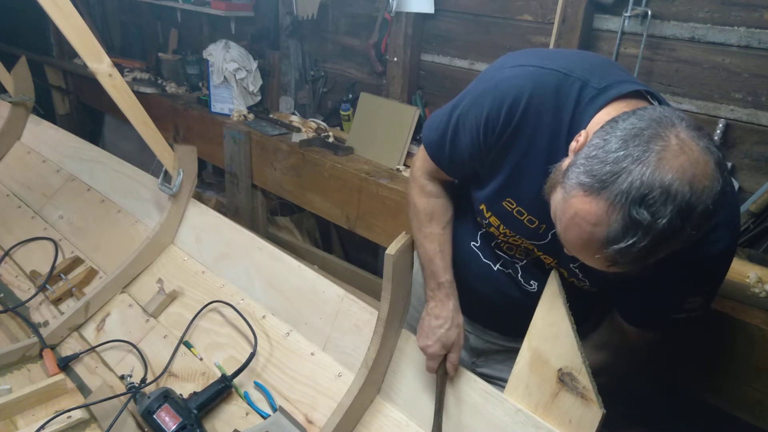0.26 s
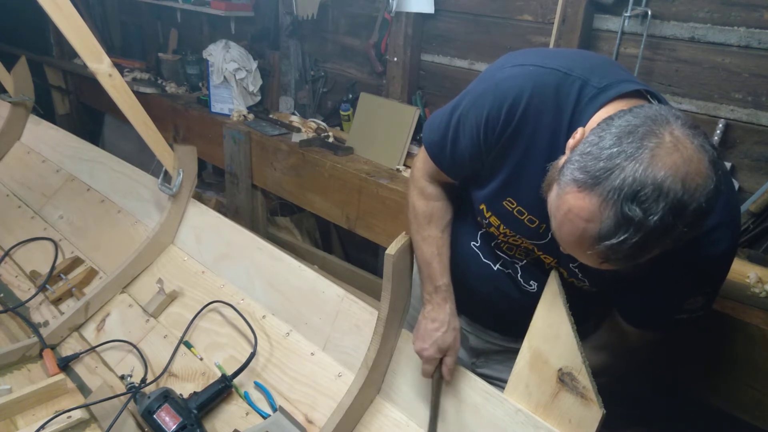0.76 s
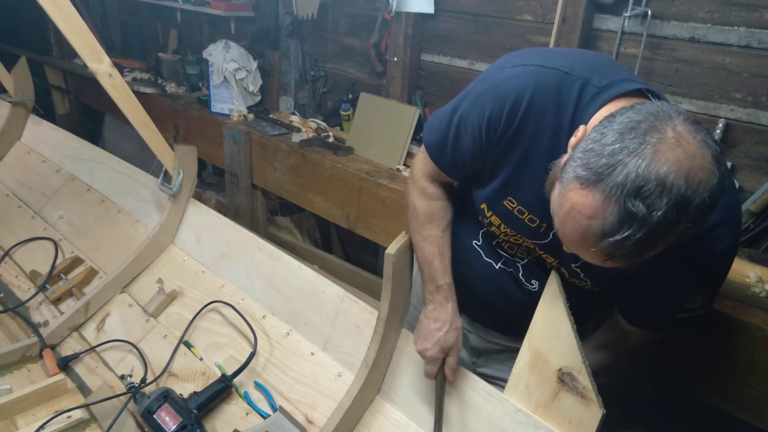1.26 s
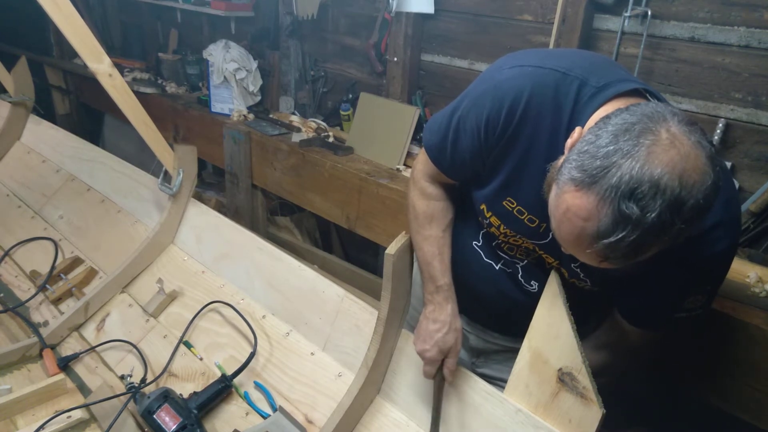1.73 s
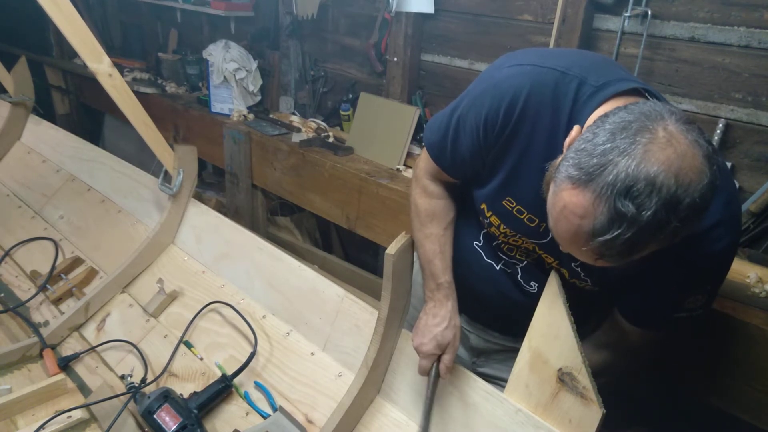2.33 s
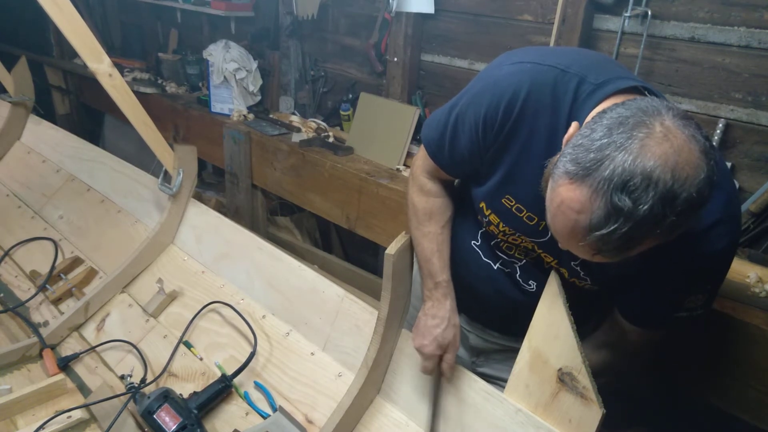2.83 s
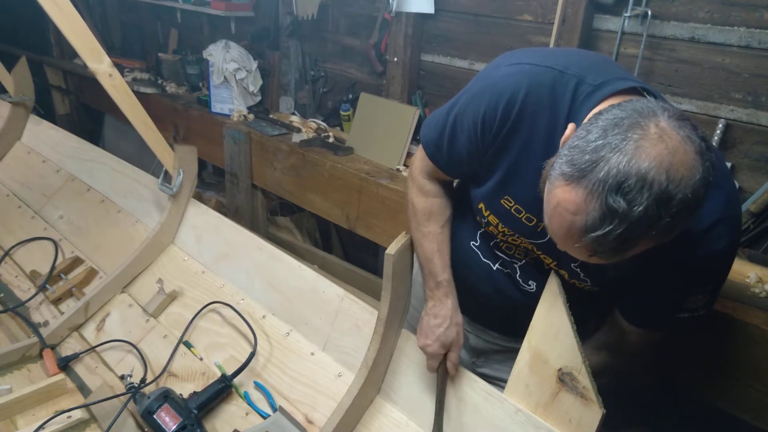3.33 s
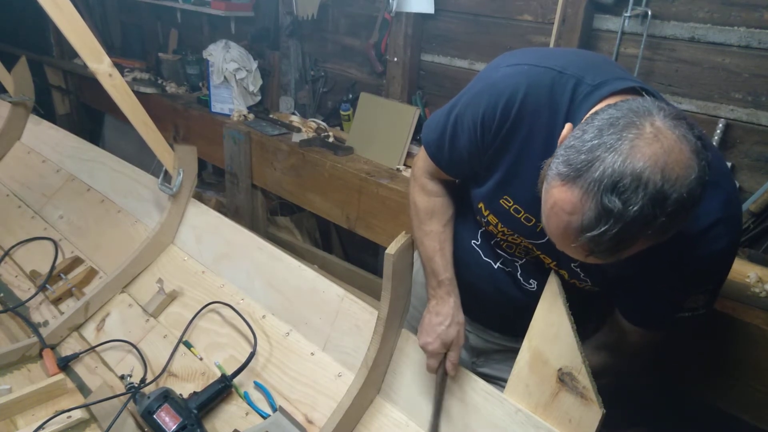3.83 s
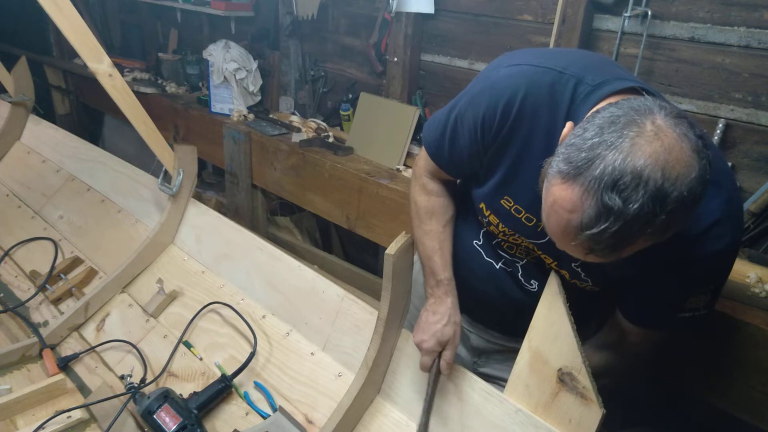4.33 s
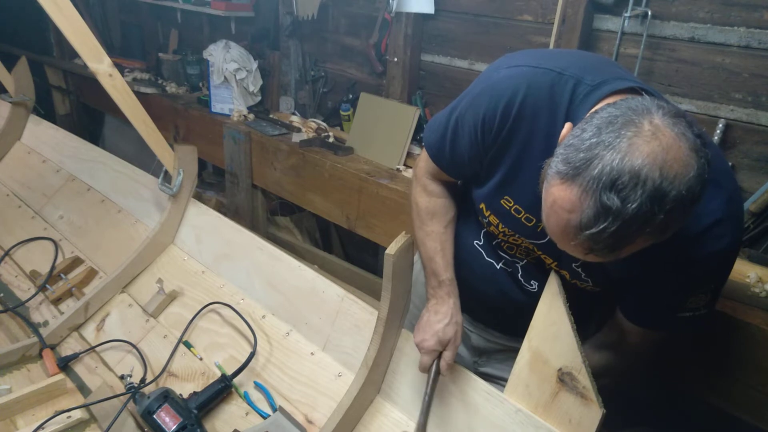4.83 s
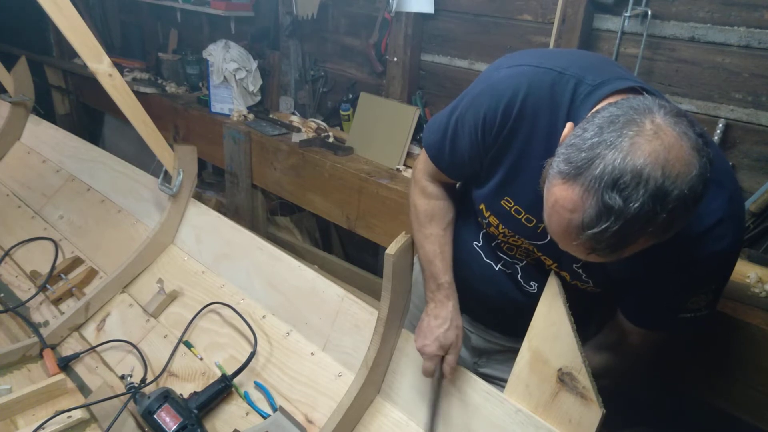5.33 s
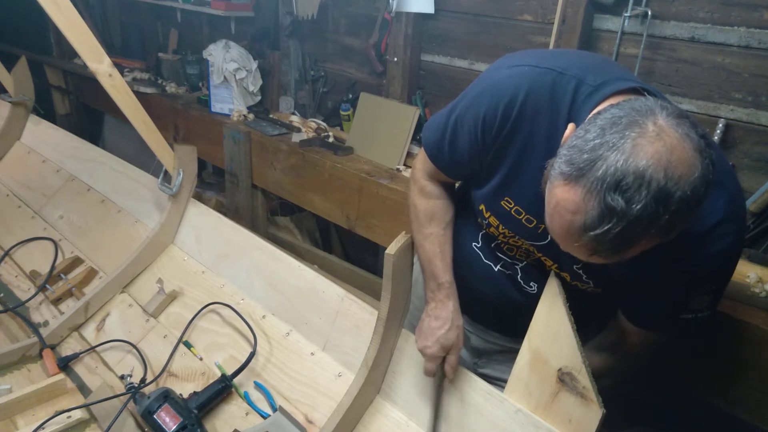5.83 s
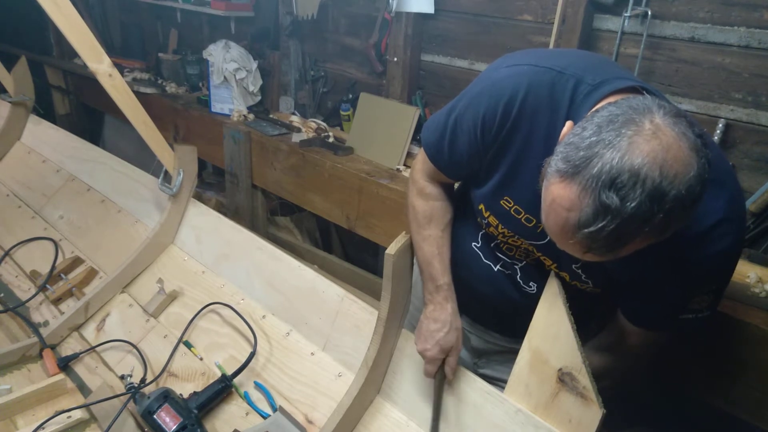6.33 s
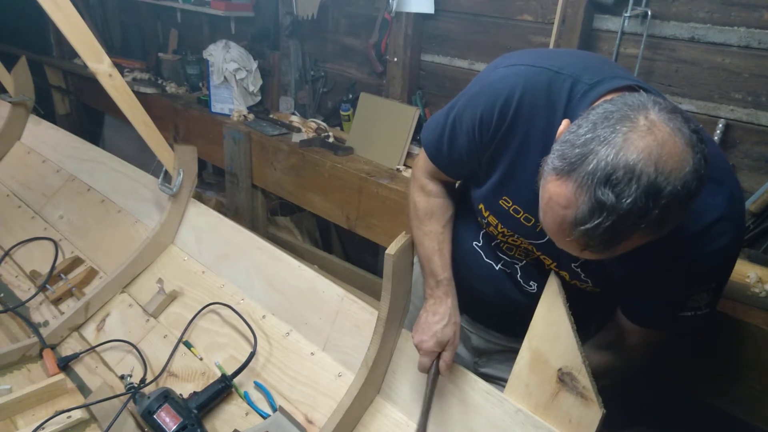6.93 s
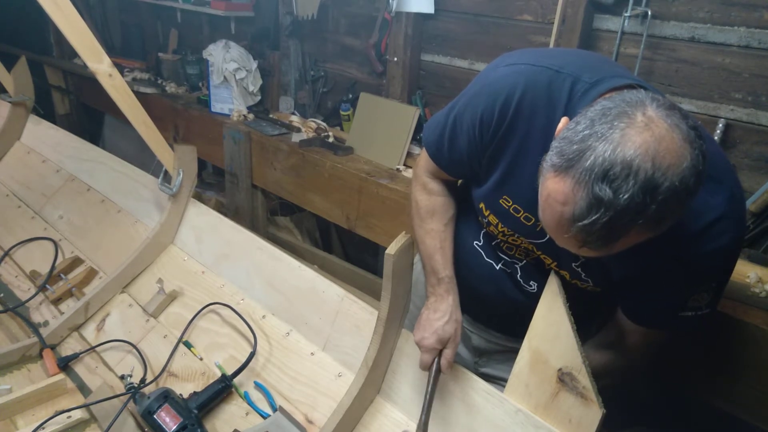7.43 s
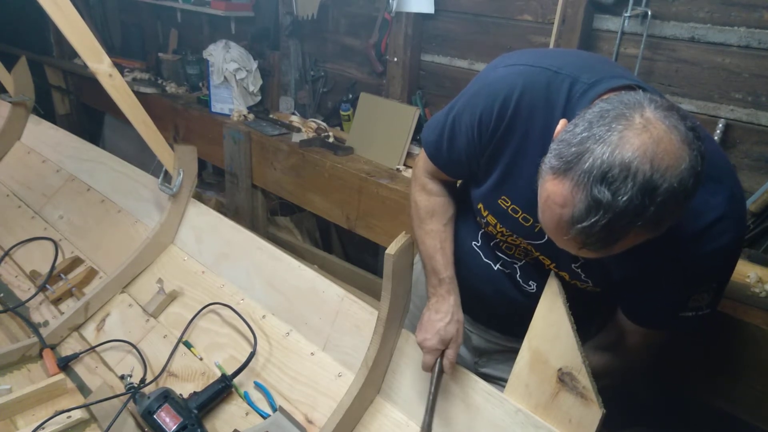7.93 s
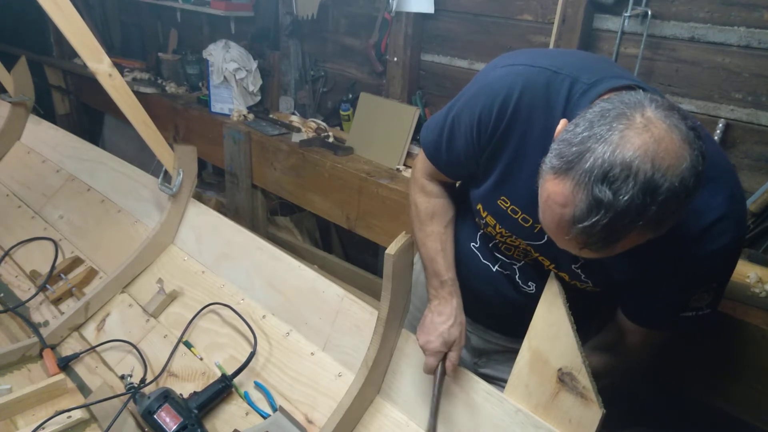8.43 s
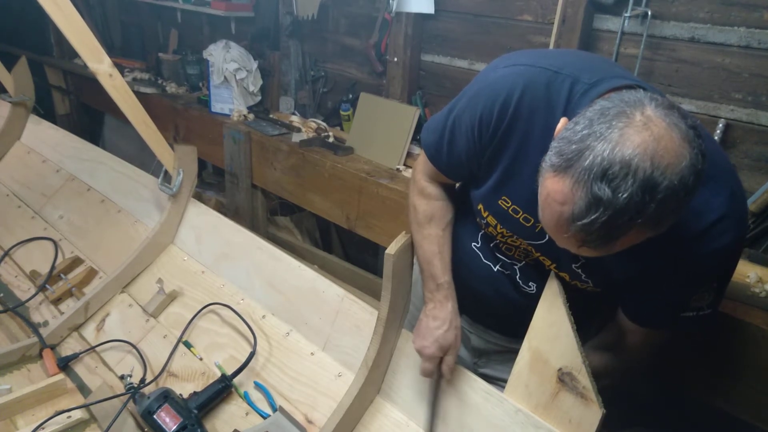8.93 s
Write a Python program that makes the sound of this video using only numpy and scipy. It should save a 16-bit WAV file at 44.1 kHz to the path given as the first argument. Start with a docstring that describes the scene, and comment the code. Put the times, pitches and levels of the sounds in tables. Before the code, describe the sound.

A blow lands at once at 0 s, and hammering runs on evenly at just over four strikes a second for about nine seconds, some thirty-nine in all. Steel hits metal rivets in a hollow wooden hull, very close, in stereo: a hard crack, a clattering plank ring lasting about a fifth of a second, and a low boom swelling beneath. Loud peaks are squashed by overload. Tone shifts from blow to blow; around 1.4 s and again at 6.6 s a strike sinks into the wood with a duller, lower knock. Around 3 to 4.5 s the knock is fuller, then drier past 5 s. Thin steel ringing and faint, dull workshop air lie between blows. From about 6.5 to 7 s the level falls sharply; the same dense hammering goes on quieter, knockier near 8 s, with a final blow just before the end.

```python
"""Copper rivets being clenched in a wooden hull, about four hammer blows a second, close to the microphones.
Each blow is shaped noise for the cracking, ringing planking plus decaying sines for the booming hull.
Steel tools ring on thinly as sines; faint filtered noise is the air of the small timber workshop.
The blows overload the recorder's input; its output is turned down ahead of the last two seconds."""
import sys
import numpy as np
from scipy import signal
from scipy.fft import rfft, irfft
from scipy.io import wavfile

SR = 44100
rng = np.random.default_rng(int(sys.argv[2]) if len(sys.argv) > 2 else 0)


def output_pcm(signal):
    """Save a mono or channel-first signal as 16-bit PCM at the path in sys.argv[1].

    Samples are clipped to [-1, 1] before scaling.
    """
    pcm = np.clip(np.atleast_2d(signal).T, -1, 1) * 32767
    wavfile.write(sys.argv[1], SR, np.round(pcm).astype(np.int16))


N = 403956

# hammer blows: start_s, force_db, glance (below 0 square on the rivet, 0 ordinary, 1 sunk into the wood)
BLOWS = [(0.0, 0.2, 0.03), (0.238, 0.5, 0.0099), (0.486, -1.3, 0.13), (0.736, 0.4, -0.25),
         (0.9784, 0, -0.34), (1.206, -0.7, 0.11), (1.438, -0.5, 0.62), (1.669, 1, -0.23),
         (1.897, 0.5, -0.025), (2.1235, 3.6, -0.16), (2.363, -2, 0.21), (2.599, -2, -0.054),
         (2.835, -0.7, -0.09), (3.0662, -1.1, 0.099), (3.2925, -0.1, -0.089), (3.5234, 0.5, -0.38),
         (3.7566, -1, -0.092), (3.9893, -1.5, 0.052), (4.2131, -1, -0.3), (4.444, -1.7, -0.38),
         (4.677, -0.5, 0.045), (4.914, -0.7, -0.13), (5.153, -1, -0.25), (5.382, -4, 0.15),
         (5.6262, -2.5, -0.28), (5.865, -1.5, -0.29), (6.1029, -1.1, 0.26), (6.3403, -0.4, -0.16),
         (6.5864, -2.5, 0.9), (6.819, 2.3, -0.044), (7.058, 4, 0.24), (7.298, 5, 0.11), (7.538, 3, 0.19),
         (7.772, 2, -0.093), (8.0082, 5, -0.077), (8.248, 3.5, -0.058), (8.487, 4, -0.23),
         (8.7215, 4.5, -0.18), (8.9616, 4, 0.21)]

TOP_HZ = 15850  # upper band limit of the recorder
RING = 20000  # samples kept of each blow
AGE = np.arange(RING) / SR  # seconds since the blow
FREQS = np.fft.rfftfreq(RING, 1 / SR)


def hammering(knock_width=0.56, clack_width=0.38, stray_octaves=0.11, count=70, memory=1.8):
    """A square blow on the rivet is bright; a glancing one sinks into the wood and knocks."""
    # what contact does to the sound: freq_hz, ordinary_db, full_glance_db (added by a glance of 1)
    contact_points = [(90, 2, 0.5), (169, 2.5, 6), (302, -0.55, 8), (524, -1.27, 11), (750, -2.36, 6.5),
                      (1140, 2, -1), (1990, 2, -7.5), (5960, 2.5, -8.5), (12000, 2.5, -9)]
    # lift of the two broad resonances as the work goes on: time_s, knock_db, clack_db
    place_lift = [(0.24, 6, 6), (0.55, -2, -0.5), (2.8, 1, -2.5), (3.2, 6.5, 4.5), (4.0, 6, 3),
                  (4.7, 4, 2.5), (5.3, -5, -1), (6.1, 4.5, 1.5), (7.201, -3.5, -1), (7.9, 10, 3.5),
                  (8.6, 1, 0)]
    # the knock drops in pitch and gains level as the hammer sinks in; the hard clack keeps its pitch
    knock_base_hz, knock_drop_octaves, knock_glance_db, clack_hz = 773, 0.8, 3, 2060
    boom_share = 1.05  # dB of hull boom per dB of force

    times, force_db, glances = np.transpose(BLOWS)
    hz, ordinary_db, glance_db = np.transpose(contact_points)
    lift_s, knock_db, clack_db = np.transpose(place_lift)

    # every striking place favours some ranges of modes and misses others
    patch_hz = np.linspace(np.sqrt(knock_base_hz), np.sqrt(TOP_HZ), count) ** 2
    patches_db = 1.9 * wander(count, memory)
    patches_db[:, 0] = 0  # the long waves of the bass do not care about the place

    force = undb(force_db)[:, None, None]
    rings = force * planking() + force ** boom_share * hull_boom() + force * steel_ring()
    strays = stray_octaves * wander(1, memory)[:, 0]
    end_fade = np.minimum((1 - AGE / AGE[-1]) * 10, 1) ** 2  # over the last tenth of the ring

    out = np.zeros((2, N + RING))
    for s, glance, stray, ring, patch_db in zip(times, glances, strays, rings, patches_db):
        contact_db = along(np.c_[hz, ordinary_db + glance * glance_db], FREQS)
        sunk = np.clip(glance, 0, 1)
        knock_hz = knock_base_hz * 2 ** (stray - knock_drop_octaves * sunk)
        knock_lift_db = np.interp(s, lift_s, knock_db) + knock_glance_db * sunk
        knock = knock_lift_db * resonance(knock_hz, knock_width * knock_hz)
        clack = np.interp(s, lift_s, clack_db) * resonance(clack_hz, clack_width * clack_hz)
        place_db = np.interp(FREQS, patch_hz, patch_db)
        sound = irfft(rfft(ring) * undb(contact_db + knock + clack + place_db))
        start = max(int(s * SR), 0)
        out[:, start:start + RING] += sound * end_fade
    return out[:, :N]


def planking(level_db=-2.0, steady=0.36, memory=2.7, crack_db=4, crack_s=0.0054, count=12):
    """The ring of every blow: partly always the same, partly shifting with the striking place."""
    places = np.array([dense_ring() for _ in range(count)])
    aim = wander(count, memory)
    aim /= np.linalg.norm(aim, axis=1, keepdims=True)
    shifting = np.tensordot(aim, places, 1)
    rings = np.sqrt(steady) * dense_ring() + np.sqrt(1 - steady) * shifting
    # steel meeting copper adds a short crack at the start, brightened by differencing
    crack = undb(crack_db) * np.diff(rings, prepend=0) * np.exp(-AGE / crack_s)
    return undb(level_db) * (rings + crack)


def dense_ring(late_db=-34, late_stretch=3):
    """Countless overlapping modes and wall echoes for one striking place; the treble dies first."""
    # dense ring of the planking in the shop: freq_hz, density_db (per Hz, relative)
    wood = [(40, -30), (90, 0), (200, -4), (350, -3), (520, -2), (700, 1), (1450, -.5), (1750, 2),
            (2350, 1), (2700, -5.5), (5500, -8), (9000, -8), (11000, -15), (13000, -24), (16000, -22.5)]
    # its decay: freq_hz, t60_s
    decay = [(100, 0.54), (260, 0.35), (600, 0.23), (1700, 0.18), (3200, 0.16), (8000, 0.16), (14000, 0.14)]
    # resonances of plank and tools, each a cluster of close modes: freq_hz, width_hz, lift_db (above the ring)
    plank = [(258.3, 15, 7), (345.7, 77, 6.5), (448, 45, 3), (579, 22, 10), (807.5, 27, 7), (920, 34, 0.5),
             (1006, 140, 5), (1200, 33, 6.5), (1330, 39, 4.5), (1648, 41, 7), (1767, 88, 3.5),
             (1954, 49, 4), (2227, 46, 5), (2335, 14, 3), (2496, 9.1, 2), (3780, 2200, 3.5), (7190, 87, 10),
             (8900, 40, -5)]
    # the microphone pair hears the treble unevenly: freq_hz, left_minus_right_db
    tilt = [(1200, 0.5), (2200, 1.5), (4000, 1), (7300, 4.5), (8400, 1), (9600, -9.5), (12000, -1.5),
            (15000, 1)]

    resonances_db = sum(db * resonance(hz, width) for hz, width, db in plank)
    colour = undb(along(wood, FREQS) + resonances_db)
    colour = colour / np.sqrt(np.mean(colour ** 2))
    uneven = undb(np.array([[1], [-1]]) * along(tilt, FREQS) / 2)
    noise = pair(FREQS, RING) * colour * uneven

    # overlapping frequency bands, one per decay time
    hz, t60 = np.transpose(decay)
    bands = [along(np.c_[hz, one], FREQS) for one in np.eye(len(hz))]
    # the quick decay of the wood gives way to the shop's weak, longer reverberation
    fades = [np.hypot(dying(t), undb(late_db) * dying(t * late_stretch)) for t in t60]
    return sum(irfft(noise * band) * fade for band, fade in zip(bands, fades))


def hull_boom(level_db=0, swell_s=0.0071, hold_s=0.082, scatter_db=4.3, memory=2):
    """The whole hull swells quickly into motion at each blow, then hums on as its slow modes decay."""
    # slow modes of the hull and the air in it: freq_hz, level_db (before scatter), t60_s
    hull = [(57.75, -38, .5), (70.5, -24, 0.39), (77.93, -20, 0.4), (97.15, -25.5, 0.49),
            (116.9, -31.5, 0.39), (138.4, -35, 0.22), (147, -29.5, 0.43), (177, -31.5, 0.13),
            (203, -37, 0.2)]
    hz, db, t60 = np.transpose(hull)[:, :, None, None]
    # higher modes lag more and more, so they never swing all together
    lag = np.pi * np.arange(len(hull))[:, None, None] ** 2 / len(hull)
    swell = 1 - np.exp(-AGE / swell_s)
    rings = undb(db) * np.sin(2 * np.pi * hz * AGE - lag) * dying(t60, hold_s) * swell
    return np.tensordot(undb(level_db + scatter_db * wander(len(hull), memory)), rings, 1)


def steel_ring(t60_s=0.9, scatter_db=4, memory=1.2):
    """Each blow shakes the steel tools lying about; their thin modes outlast the planking in the gaps."""
    # tools that ring on faintly: freq_hz, level_db (before scatter)
    steel = [(1540, -56.5), (2740, -58.5), (3120, -65), (3660, -62), (3830, -59.5), (4780, -66),
             (5870, -74)]
    hz, db = np.transpose(steel)
    phase = rng.uniform(0, 2 * np.pi, (len(steel), 2, 1))
    rings = np.sin(2 * np.pi * hz[:, None, None] * AGE + phase) * dying(t60_s)
    return np.tensordot(undb(db + scatter_db * wander(len(steel), memory)), rings, 1)


def workshop_air(level_db=-54):
    """Faint, dull room noise behind the work: random air noise with its treble rolled away."""
    # quiet workshop air: freq_hz, density_db (per Hz, relative)
    air_colour = [(25, -2), (70, 2), (150, -3), (400, -14), (1000, -15), (1600, -18), (3400, -28),
                  (3850, -21), (4300, -31), (4800, -27), (5300, -33), (10000, -33), (15000, -43)]
    hz = np.fft.rfftfreq(N, 1 / SR)
    air = irfft(pair(hz, N) * undb(along(air_colour, hz)), N)
    return air / air.std() * undb(level_db)


def wander(count, memory):
    """Values that change a little from blow to blow, as the hammer's aim does; spread 1, memory in blows."""
    keep = np.exp(-1 / memory)
    steps = rng.standard_normal((len(BLOWS), count))
    steps[1:] *= np.sqrt(1 - keep ** 2)
    return signal.lfilter([1], [1, -keep], steps, axis=0)


def dying(t60, hold_s=0.015):
    """Early echoes hold the level up for a moment before it falls evenly."""
    held_age = np.hypot(AGE, hold_s) - hold_s
    return np.exp(-np.log(1000) * held_age / t60)


def resonance(hz, width):
    """Bell shape of a resonance over frequency, top 1, width in Hz at half height."""
    return 1 / (1 + (2 * (FREQS - hz) / width) ** 2)


def pair(hz, size, apart_hz=560):
    """Noise spectra at two spaced microphones: alike in the bass, unrelated in the treble."""
    mid, side = rfft(rng.standard_normal((2, size)))
    likeness = .98 / (1 + (hz / apart_hz) ** 3)
    shared = mid * np.sqrt(1 + likeness)
    opposed = np.array([[1], [-1]]) * side * np.sqrt(1 - likeness)
    return (shared + opposed) / np.sqrt(2)


def along(points, hz):
    """Read (Hz, value) points on a log-frequency axis."""
    f, value = np.transpose(points)
    return np.interp(np.log(hz + 1), np.log(f), value)


def undb(db):
    """Decibels to gain."""
    return 10 ** (np.asarray(db) / 20)


def scene():
    """Riveting close by, in the quiet shop."""
    return hammering() + workshop_air()


def record(dry, gain_db=1.01, low_cut_hz=48, knee=3.5):
    """The overloaded input flattens the loud peaks of the blows; then come the fader and the band limits."""
    # output level of the recorder, on top of its fixed gain: time_s, level_db
    fader = [(0, -2.5), (6.45, -2), (6.85, -6.5), (7.05, -10.5), (7.8, -10.5), (8.0, -10), (9.1, -10.5)]
    flattened = dry / (1 + np.abs(dry) ** knee) ** (1 / knee)
    fader_db = np.interp(np.arange(N) / SR, *np.transpose(fader))
    faded = flattened * undb(gain_db + fader_db)
    low_cut = signal.butter(2, low_cut_hz, "high", fs=SR, output="sos")
    top_cut = signal.ellip(8, .05, 50, TOP_HZ, fs=SR, output="sos")
    limited = signal.sosfiltfilt(top_cut, signal.sosfilt(low_cut, faded))
    return np.clip(limited, -1, 1)


dry = scene()
out = record(dry)
output_pcm(out)
```